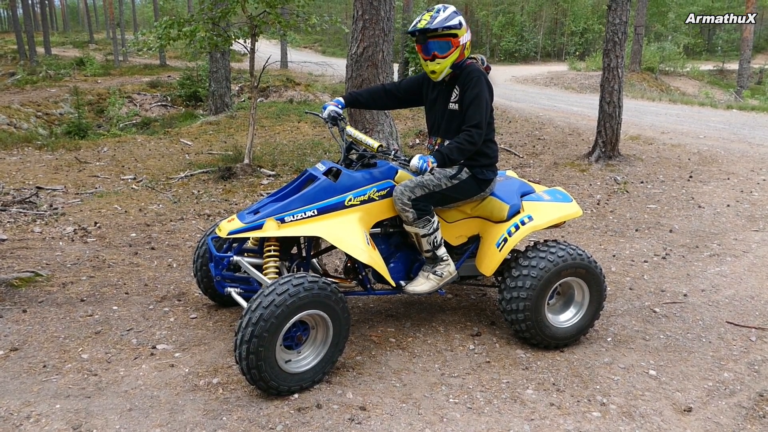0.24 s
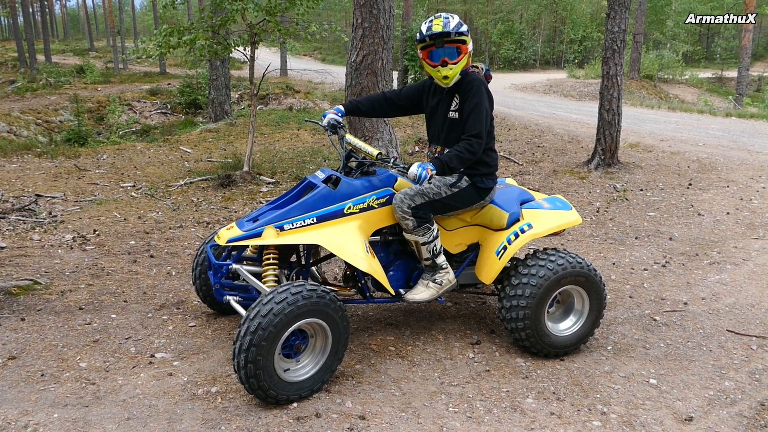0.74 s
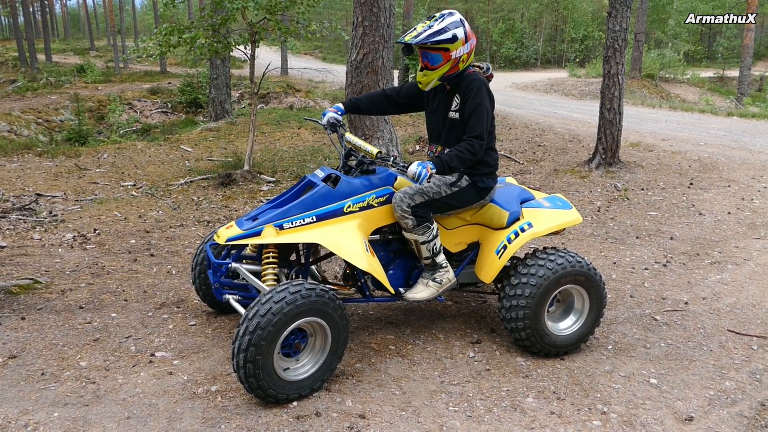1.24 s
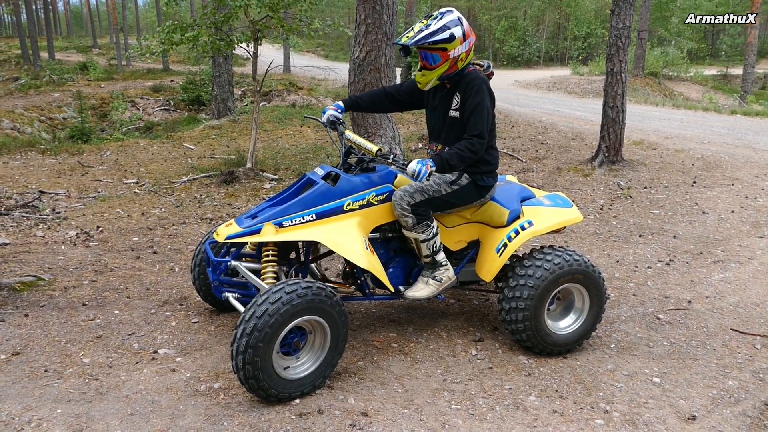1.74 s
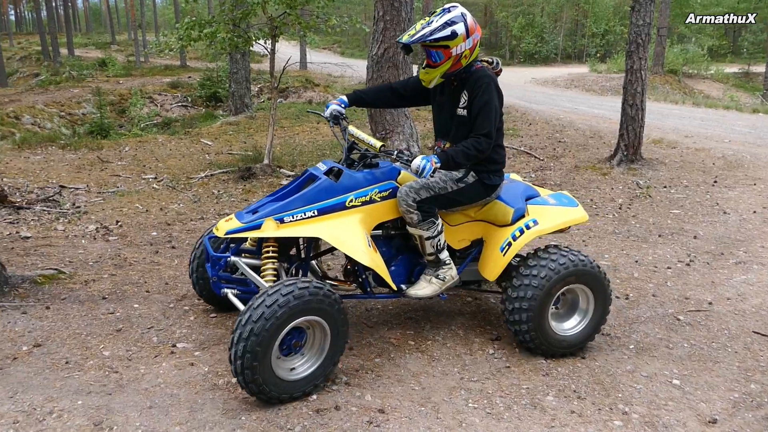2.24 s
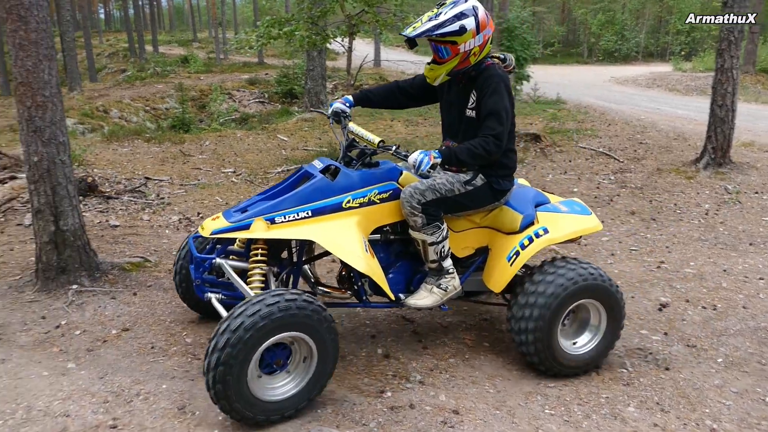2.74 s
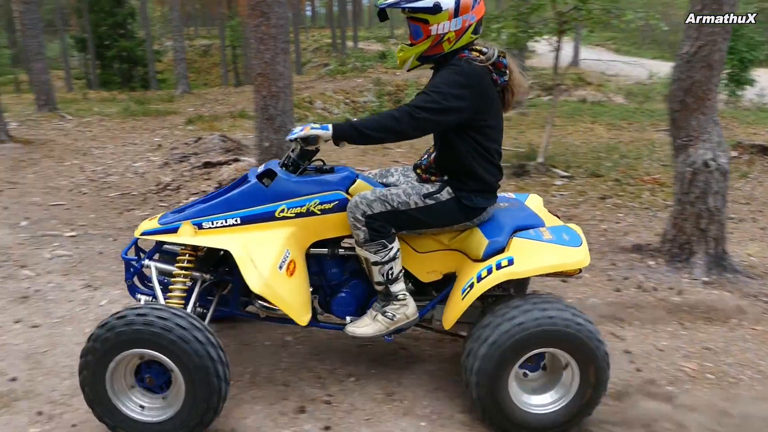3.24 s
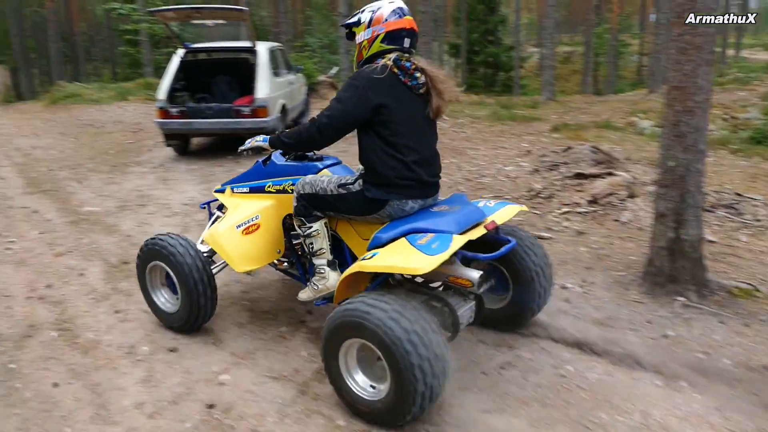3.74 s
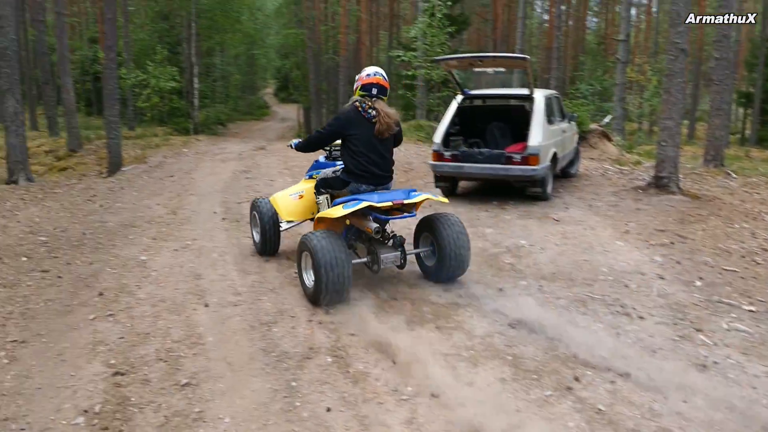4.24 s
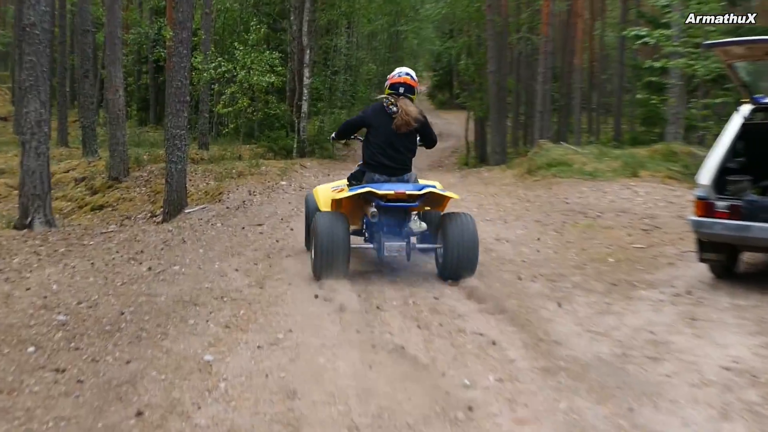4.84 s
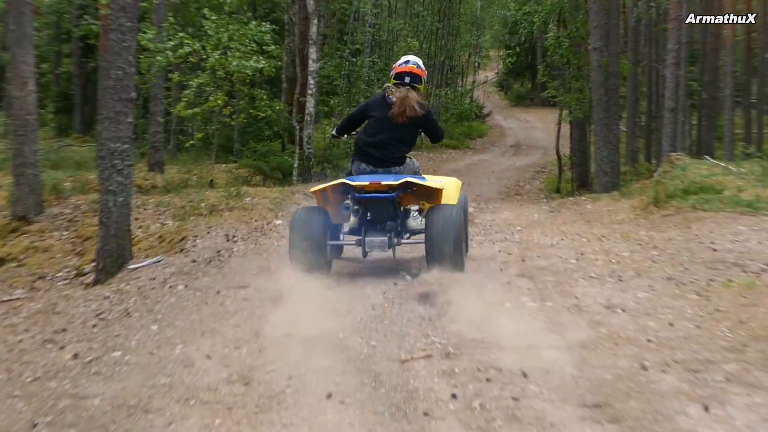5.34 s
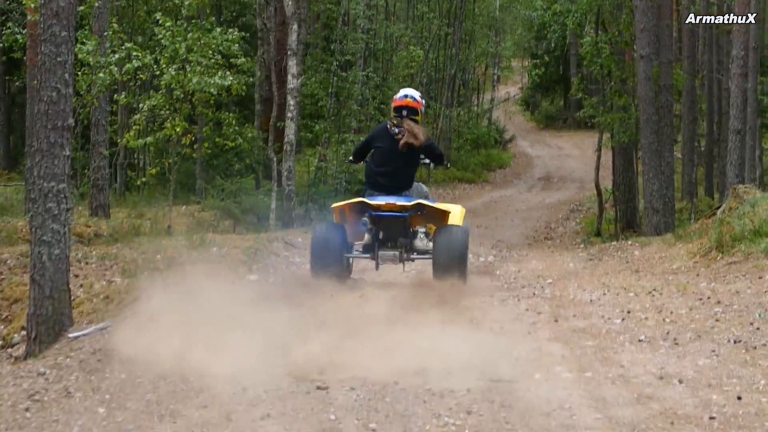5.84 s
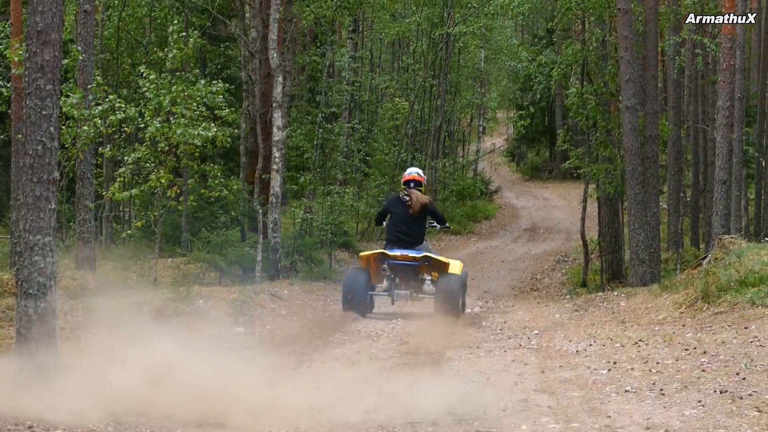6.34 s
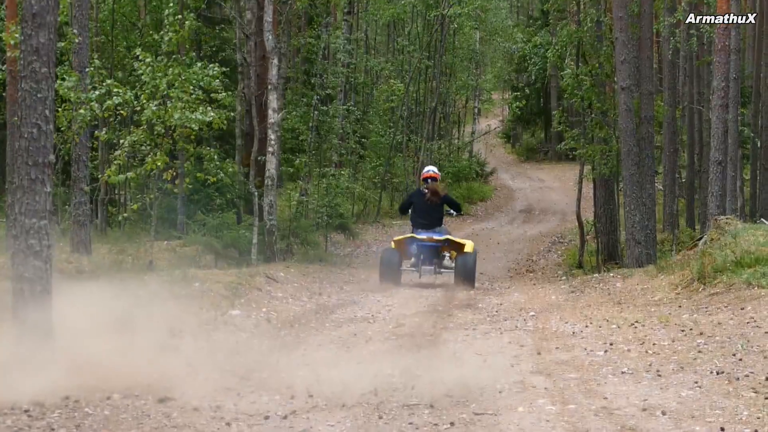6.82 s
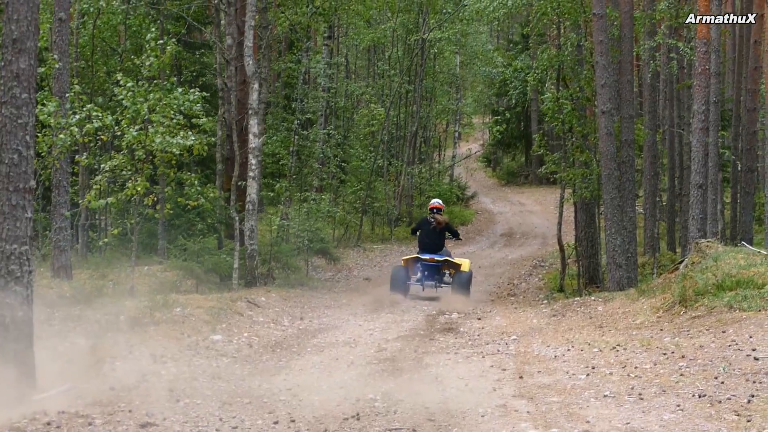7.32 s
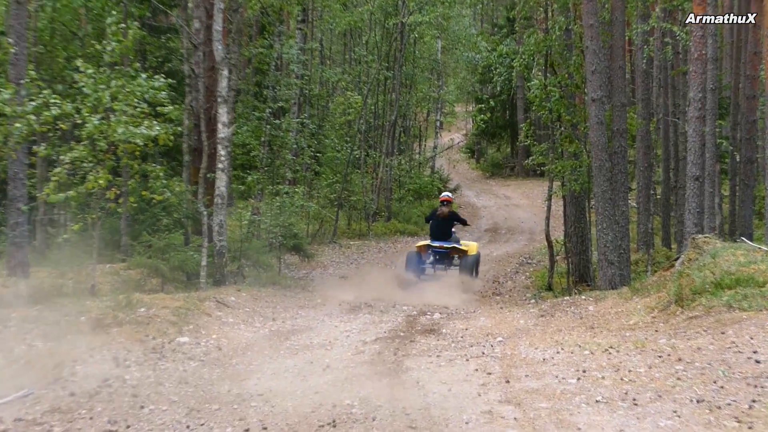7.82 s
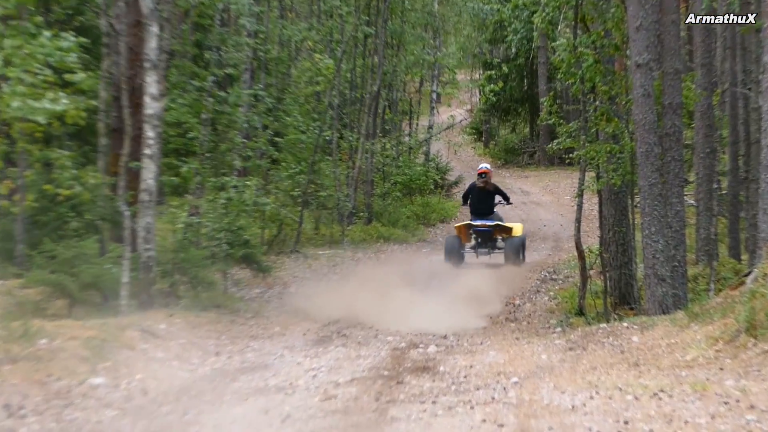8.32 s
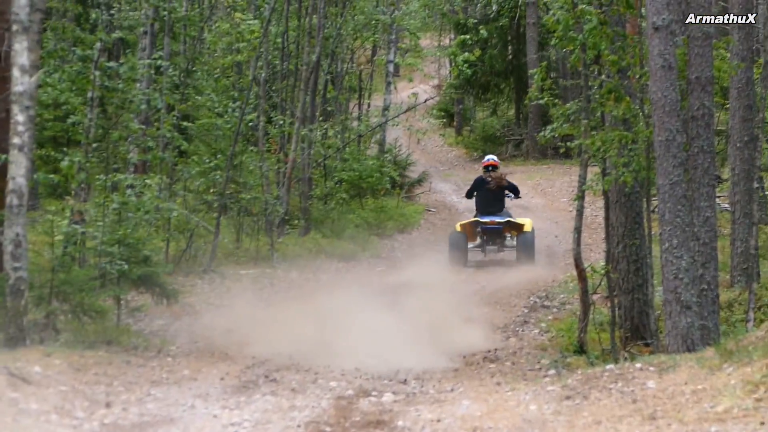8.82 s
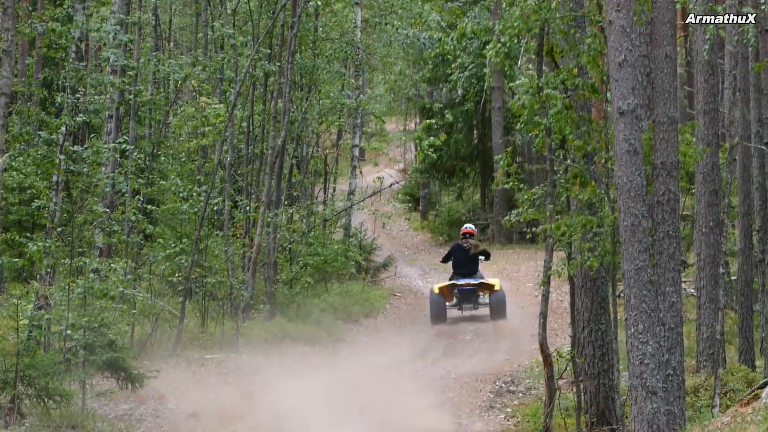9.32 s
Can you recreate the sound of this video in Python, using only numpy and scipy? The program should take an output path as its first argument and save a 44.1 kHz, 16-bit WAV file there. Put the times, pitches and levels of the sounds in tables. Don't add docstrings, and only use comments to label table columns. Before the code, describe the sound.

A two-stroke quad stands beside the microphone on a forest track. From 0 to 2.3 s it idles unevenly: a quick flurry of pops as revs fall from a fading blip, then gaps and paired sharp cracks over a fluttering drone, with bright metallic clatter and hiss. From 2.3 s the firing thickens into a lumpy rattle, and around 3.3 to 4.1 s it pulls off, pitch rising into a rasp. Revs drop near 4.5 s with stuttering bangs, then surge to a hard snarl at 5.5 s, wobble, and fall at 6.4 s. Loose popping follows until 7 s, when dense firing builds to another high buzzing peak at 8 s. The throttle then eases: a steadier hollow drone and airy hiss remain to 9.5 s, with one isolated pop around 9.1 s. The sound becomes more distant and less bright, with low rumble and a short soft echo from the trees.

```python
import sys
import numpy as np
from scipy import signal
from scipy.fft import rfft, irfft
from scipy.io import wavfile
from scipy.ndimage import uniform_filter1d

SR = 44100
rng = np.random.default_rng(int(sys.argv[2]) if len(sys.argv) > 2 else 0)


def ratio_of_db(decibels):
    return 10 ** (np.asarray(decibels, float) / 20)


def dump(signal):
    limited = np.clip(np.atleast_2d(signal).T, -1, 1)
    pcm = np.round(limited * 32767).astype(np.int16)
    wavfile.write(sys.argv[1], SR, pcm)


N = 422037

# time_s, turns_per_s_hz
CRANK_SPEED = [(0, 42), (2.05, 50.5), (2.5, 43.5), (3.2, 46), (3.97, 62), (4.15, 76), (4.61, 49), (5.2, 62),
               (5.54, 104), (5.76, 79.5), (5.91, 92.5), (6.1, 92.5), (6.42, 56), (7.05, 63), (7.54, 88.2),
               (8.05, 104), (8.28, 73.5), (9.57, 70.5)]


def exhaust(at, fire_db):
    # centre_hz, width_hz, level_db
    thump_modes = [(206.6, 113, 1), (290, 79, 1.5)]
    honk_modes = [(431.4, 77.4, -1), (474.4, 75, -5)]
    bark_modes = [(662, 130, -2.5), (846, 173, -2)]
    crack_modes = [(1160, 200, -3), (1400, 220, -6), (2110, 400, -15)]
    thump_db, deep_db, honk_db = levels("thump", "deep", "honk")
    bark_db, yap_db, crack_db, snap_db = levels("bark", "yap", "crack", "snap")

    fired = clicks(at, fire_db + 10.5, spread_db=0.9)
    thump = ratio_of_db(deep_db) * resonate(fired, thump_modes[:1]) - resonate(fired, thump_modes[1:])
    low = ratio_of_db(thump_db) * thump + ratio_of_db(honk_db - 5) * resonate(fired, honk_modes)
    swell = signal.sosfilt(signal.butter(2, 520, fs=SR, output="sos"), low)

    front = clicks(at, 1.22 * (fire_db + 14) - 4, spread_db=0.36)
    hot_gas = decay(front, t60_s=0.035) * rng.standard_normal(N)
    sharp = front + 0.05 * hot_gas
    bark = resonate(sharp, bark_modes[:1]) - ratio_of_db(yap_db) * resonate(sharp, bark_modes[1:])
    crack = resonate(sharp, crack_modes[:2]) + ratio_of_db(snap_db) * resonate(sharp, crack_modes[2:])
    out = swell + ratio_of_db(bark_db) * bark + ratio_of_db(crack_db - 4) * crack
    return signal.sosfilt(signal.butter(4, 135, "high", fs=SR, output="sos"), out)


def crank():
    # first_firing_s, last_firing_s, first_db, following_db
    runs = [(.214, .255, -21, -13), (.465, .465, -19, -19), (.509, .55, -22, -15), (.649, .649, -13, -13),
            (.931, .931, -20.5, -20.5), (2.651, 2.715, -16, -17), (2.759, 2.864, -14, -18),
            (2.908, 2.975, -16, -19), (3.019, 3.309, -15, -18), (3.37, 3.37, -20, -20),
            (3.522, 3.522, -13, -13), (3.64, 3.694, -12.5, -16), (3.781, 3.848, -14, -16),
            (3.98, 4.128, -12, -13), (4.423, 4.512, -11.5, -15), (4.695, 4.792, -13, -15),
            (5.042, 5.127, -14, -14), (5.16, 5.349, -13, -13), (5.362, 5.543, -12, -14),
            (5.668, 5.668, -18, -18), (5.726, 5.726, -12, -12), (5.764, 5.925, -17, -15),
            (6.163, 6.163, -17, -17), (7.074, 7.439, -14, -14), (7.451, 7.621, -13, -14),
            (7.644, 8.054, -15, -13.5), (8.074, 8.074, -15, -15), (8.126, 8.126, -18, -18),
            (9.122, 9.122, -14, -14)]
    # first_group_s,
    # last_group_s, turns_per_group, first_db, second_db
    stutters = [(1.018, 1.174, 7, -12, -14), (1.349, 1.48, 6, -11.5, -17.5), (1.585, 1.669, 4, -13, -40),
                (1.732, 1.813, 4, -17, -14.5), (1.913, 2.224, 4, -15.5, -18), (2.286, 2.286, 3, -19, -17),
                (2.35, 2.583, 2, -14.5, -40), (3.325, 3.325, 2, -17, -18), (3.398, 3.45, 3, -17.5, -16.5),
                (3.58, 3.58, 3, -13, -16), (3.73, 3.73, 3, -16, -15), (3.882, 3.931, 3, -12, -13.5),
                (4.568, 4.631, 3, -11, -40), (4.829, 4.99, 3, -11.5, -13), (5.565, 5.565, 3, -18, -16),
                (5.946, 6.08, 4, -16.5, -15), (6.469, 6.539, 4, -19, -18), (6.627, 6.676, 3, -16, -16),
                (6.741, 7.009, 4, -16, -15.5)]
    turns = np.cumsum(speed()) / SR
    rows = [(start, end, 1, first, rest) for start, end, first, rest in runs] + stutters
    rows = np.array(sorted(rows))
    marks = (rows[:, :2].ravel() * SR).astype(int)
    step = np.stack([rows[:, 2], np.ones(len(rows))], axis=1).ravel()[:-1]
    whole = np.concatenate([[0], np.cumsum(step * np.round(np.diff(turns[marks]) / step))])
    nudge = np.interp(np.arange(N), marks, whole - turns[marks])
    turns = np.maximum.accumulate(turns + nudge)
    number = np.arange(np.ceil(turns[0]), turns[-1])
    at = np.searchsorted(turns, number - 1e-6).clip(0, N - 1)

    fire_db = np.full(len(at), -np.inf)
    for (first, last), (_, _, group, first_db, next_db) in zip(whole.reshape(-1, 2), rows):
        leads = np.arange(first, last + 1, group)
        fire_db[np.isin(number, leads + 1 if group > 1 else leads)] = next_db
        fire_db[np.isin(number, leads if group > 1 else first)] = first_db
    fire_db[fire_db < -30] = -np.inf
    return at, fire_db


def speed():
    # start_s, gain_hz
    kicks = [
        (-.1, 17),
        (.25, 5),
        (.47, 1.5),
        (.55, 3),
        (.66, 4.5),
    ]
    rise_s, fade_s = 0.015, 0.2
    out = in_time(CRANK_SPEED)[0]
    for start_s, gain_hz in kicks:
        age_s = np.maximum(np.arange(N) / SR - start_s, 0)
        out = out + gain_hz * (np.exp(-age_s / fade_s) - np.exp(-age_s / rise_s))
    return out


def clatter(at, fire_db):
    # frequency_hz, density_db_per_hz
    sheet_spectrum = [(1060, -73), (1800, -14.5), (2420, -13.5), (2630, -41), (2850, -12), (3910, -7),
                      (4470, -8), (4810, -4), (7470, -12), (9880, -7), (15500, -22)]
    # centre_hz, width_hz, level_db
    side_fins = [(2480, 50, -4), (2780, 40, 1), (3780, 30, 0), (4100, 30, -6), (4285, 22, -7),
                 (6800, 40, -8)]
    rear_fins = [(3040, 28, -1), (3215, 20, -4), (4000, 50, -3), (4790, 45, 3), (5600, 60, -3)]
    clatter_db, side_db, rear_db = levels("clatter", "side", "rear")
    fired = clicks(at, 1.33 * (fire_db + 14) - 14.5, spread_db=1.28)
    shake = np.sqrt(decay(fired ** 2, t60_s=0.14 / 2))
    build = np.exp(-1 / (0.0017 * SR))
    shake = signal.lfilter([1 - build], [1, -build], shake)
    side, rear = [sum(resonate(shake * rng.standard_normal(N), [mode]) for mode in fins)
                  for fins in (side_fins, rear_fins)]
    fins = ratio_of_db(side_db - 34) * side + ratio_of_db(rear_db - 39) * rear
    return ratio_of_db(clatter_db + 1) * (shake * stereo_noise(sheet_spectrum, alike=0.85) + fins)


def pumping(at, fire_db):
    # centre_hz, width_hz, level_db
    port_modes = [(222, 160, 6.5), (314, 47, 2), (341, 60, -1), (428, 112, -2)]
    reed_modes = [(1418, 95, 30), (847, 36, 10)]
    rattle_modes = [(2143, 280, 3), (1165, 185, -11.5)]
    intake_db, puff_db, rattle_db = levels("intake", "puff", "rattle")
    puff_db = np.minimum(puff_db, -25)
    unfired_db = np.where(np.isinf(fire_db), 0, -14)
    puffs = resonate(clicks(at, unfired_db, spread_db=2.5), port_modes)
    turbulence = resonate(rng.standard_normal(N), port_modes)
    pipe = rms_one(puffs) + 0.89 * rms_one(turbulence)
    pipe = signal.sosfilt(signal.butter(4, 150, "high", fs=SR, output="sos"), pipe)

    gate = 0.35 + decay(clicks(at, 0, spread_db=1.5), t60_s=0.05)
    reeds = rms_one(resonate(gate * rng.standard_normal(N), reed_modes))
    rattle = rms_one(resonate(gate * rng.standard_normal(N), rattle_modes))
    air_box = intake(at, fire_db) + ratio_of_db(-9) * reeds
    return ratio_of_db(intake_db + 1.5) * air_box + ratio_of_db(puff_db - 3) * pipe + ratio_of_db(rattle_db - 6) * rattle


def intake(at, fire_db):
    # multiple_of_crank_speed, level_db
    partials = [(1, -38), (2, -1.5), (3, -14), (4, -1.5), (5, -1), (6, -7), (7, -10), (8, -13), (9, -15)]
    turns, boom_db = np.cumsum(speed()) / SR, levels("boom")[0]
    lag = np.interp(np.arange(N), at, np.arange(len(at)) + 1 - turns[at])
    turns = turns + uniform_filter1d(lag, size=2205)
    out, whole = 0, np.arange(at.size + 2)
    for multiple, db in partials:
        draws = rng.standard_normal((2, len(whole)))
        waver_db, slip = [np.interp(turns, whole, draw) for draw in draws]
        level_db = db + boom_db * (multiple < 3) + 1.5 * waver_db
        phase = 2 * np.pi * (multiple * turns + rng.random()) + 0.15 * slip
        out = out + ratio_of_db(level_db) * np.sin(phase)
    fade = np.exp(-1 / (0.06 * SR))
    choke = signal.lfilter([1], [1, -fade], clicks(at, fire_db - 4, spread_db=8))
    return rms_one(out) / (1 + uniform_filter1d(choke, size=441, origin=220))


def hiss():
    # frequency_hz, density_db_per_hz
    hiss_spectrum = [(330, 10), (560, 5), (662, 3.5), (1250, -3), (1700, -6), (2160, -11), (2650, -4.5),
                     (3710, -7), (4260, -4.5), (8180, -18), (9800, -14.5), (14100, -31.5), (15500, -26)]
    return ratio_of_db(levels("hiss")[0] - 2) * stereo_noise(hiss_spectrum, alike=0.72)


def tyre_rumble():
    # frequency_hz, density_db_per_hz
    rumble_spectrum = [(15, -21), (30, -2), (60, -8), (110, 3.5), (170, -17)]
    return ratio_of_db(levels("rumble")[0]) * stereo_noise(rumble_spectrum, alike=0.85)


def forest(x):
    s = np.arange(int(0.7 * SR)) / SR
    t60_s, gap_s, cut_hz = 0.25, 0.015, 13600
    tail = rng.standard_normal((2, len(s))) * ratio_of_db(-60 * s / t60_s) * (s > gap_s)
    apart = 0.19 * signal.sosfilt(signal.butter(2, 450, "high", fs=SR, output="sos"), tail[1])
    tail = tail[0] + apart * [[1], [-1]]
    tail = signal.sosfilt(signal.butter(1, cut_hz, fs=SR, output="sos"), tail)
    tail /= np.sqrt(np.sum(tail ** 2, axis=1, keepdims=True))
    return signal.fftconvolve(x[None], tail, axes=1)[:, :N]


def levels(*names):
    # time_s, flow_db
    throttle = [(0, 1.5), (.25, -1.5), (1.3, -1), (3.4, -2), (4.1, -3), (4.2, -2), (4.4, -4), (4.5, -1.5),
                (5.0, -0.5), (5.3, -0.5), (6.2, -2), (6.4, -8), (6.55, -4.5), (7.0, -3), (7.4, -0.5),
                (8.05, 0.5), (8.3, -5.5), (9.57, -3)]
    # time_s, turned (0 side-on to 1 tail-on), distance_share (0-1)
    path = [(0, 0.005, 0), (1.3, 0.011, 0.07), (2.3, 0.12, 0.17), (3.0, 0.23, 0.16), (3.4, 0.39, 0.17),
            (3.8, 0.7, 0.09), (4.15, 0.85, 0.25), (4.42, 0.95, 0.21), (4.8, .99, 0.59), (5.5, 0.89, 0.52),
            (6.6, .99, 1), (9.57, 0.94, 0.88)]
    layer_follow = {"intake": (-19.5, 1.6, 3.2, -30.5, -0.5, 0.5), "boom": (-3, -0.2, 4.5, -31.5, 14.5, -5),
                    "puff": (-31.5, 1.13, -14, 21.5, -3, 12.5), "rattle": (-25, .4, -3, -8, 9, -20),
                    "hiss": (-25.5, 2.2, -1.07, 1.8, -0.7, 8.2), "rumble": (-34.5, 2.45, 7, -14, -1.7, 4),
                    "clatter": (1.24, 0.7, -10, -0.5, -3.1, 3), "side": (1.6, -3.63, -23, 4.5, 9, 0.5),
                    "rear": (-5, 1.45, 2, 15.5, -14, 15), "treble": (-2, -1.84, -7, -1, 2.5, 3),
                    "echo": (-15.5, 0.87, 1.2, -0.5, 0, 0.5), "pan": (1.5, 0.11, 0.33, -0.1, -0.031, 0.24)}
    pipe_follow = {"thump": (1, 0.47, 6, -0.7, -0.8, -4), "deep": (2, 0.5, -4, 4, -4, 3),
                   "honk": (-6.5, 0.97, 11, 6.5, -2.3, 15), "bark": (1.83, -1.12, -5.5, -12, 7, 2.5),
                   "yap": (1.4, 1.83, 3.5, -8, -2.8, -2.5), "crack": (1.5, 1.64, 0.5, -12, 7.5, 2.5),
                   "snap": (-2.5, -0.96, 8.5, 0, -1, 0.5)}
    turned, far = in_time(path)
    revs = np.log2(in_time(CRANK_SPEED)[0] / 50)
    mid_turn = np.sin(np.pi * np.clip(turned, 0, 1))
    controls = [np.ones(N), *in_time(throttle), turned, far, revs, mid_turn]
    follow = {**layer_follow, **pipe_follow}
    return np.array([follow[name] for name in names]) @ controls


def clicks(at, db, spread_db):
    out = np.zeros(N)
    out[at] = ratio_of_db(db + spread_db * rng.standard_normal(len(at)))
    return out


def decay(x, t60_s):
    return signal.lfilter([1], [1, -ratio_of_db(-60 / (t60_s * SR))], x)


def resonate(x, modes):
    out = 0
    for k, (hz, width_hz, db) in enumerate(modes):
        r, w = np.exp(-np.pi * width_hz / SR), 2 * np.pi * hz / SR
        ring = signal.lfilter([0, np.sin(w)], [1, -2 * r * np.cos(w), r * r], x + 1e-18)
        out = out + (-1) ** k * ratio_of_db(db) * ring
    return out


def stereo_noise(spectrum, alike):
    hz, points = np.fft.rfftfreq(N, 1 / SR), np.array(spectrum)
    colour_db = np.interp(np.log(hz + 1), np.log(points[:, 0]), points[:, 1], left=-90, right=-90)
    mid, side = irfft(rfft(rng.standard_normal((2, N))) * ratio_of_db(colour_db), N)
    alike = np.clip(alike, 0, 1)
    return rms_one(np.sqrt(1 + alike) * mid + np.sqrt(1 - alike) * side * [[1], [-1]])


def rms_one(x):
    return x / np.sqrt(np.mean(x ** 2) + 1e-20)


def in_time(rows):
    s, *columns = np.transpose(rows)
    return [np.interp(np.arange(N) / SR, s, c) for c in columns]


def scene():
    treble_db, echo_db, pan_db = levels("treble", "echo", "pan")
    at, fire_db = crank()
    low = exhaust(at, fire_db) + pumping(at, fire_db)
    high = clatter(at, fire_db) + hiss()
    dull = signal.sosfilt(signal.butter(1, 9000, fs=SR, output="sos"), high)
    high = dull + ratio_of_db(treble_db) * (high - dull)
    bass = signal.sosfilt(signal.butter(1, 500, fs=SR, output="sos"), low)
    near = bass + (low - bass + high) * ratio_of_db(np.outer([0.5, -0.5], pan_db))
    echo = forest(ratio_of_db(echo_db) * (low + ratio_of_db(6.5) * high.mean(axis=0)))
    return near + tyre_rumble() + echo


def top_cut(x):
    return signal.sosfilt(signal.butter(12, 15820, fs=SR, output="sos"), x)


def record(dry):
    # centre_hz, width_hz, depth_db
    housing_notches = [(577, 70, -22), (2700, 120, -26)]
    x = signal.sosfilt(signal.butter(2, 95, "high", fs=SR, output="sos"), dry)
    for hz, width_hz, db in housing_notches:
        b, a = signal.iirpeak(hz, hz / width_hz, fs=SR)
        x = x - (1 - ratio_of_db(db)) * signal.lfilter(b, a, x)
    level_db = 10 * np.log10(uniform_filter1d(np.mean(x ** 2, axis=0), size=220) + 1e-12)
    fall_db = 60 * np.arange(N) / SR
    held_db = np.maximum.accumulate(level_db + fall_db) - fall_db
    over_db = np.maximum(held_db + 18, 0)
    x = x * ratio_of_db(-0.3 * uniform_filter1d(over_db, size=88))
    return top_cut(1.3 * np.tanh(x / 1.3))


dry = scene()
out = record(dry)
dump(out)
```